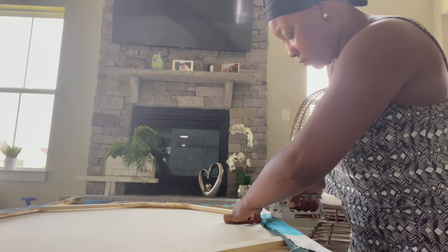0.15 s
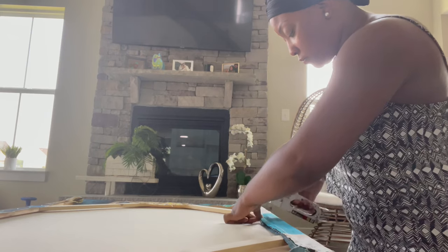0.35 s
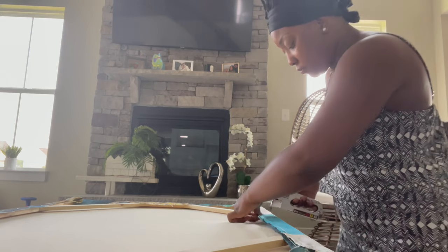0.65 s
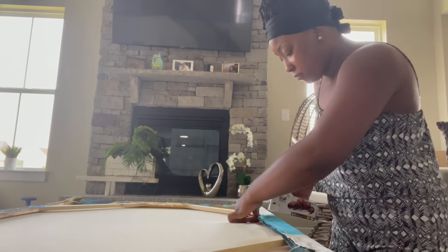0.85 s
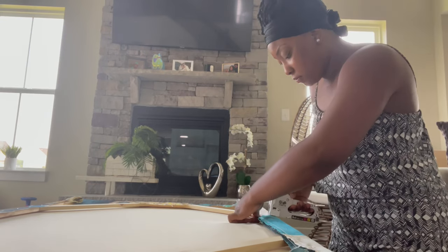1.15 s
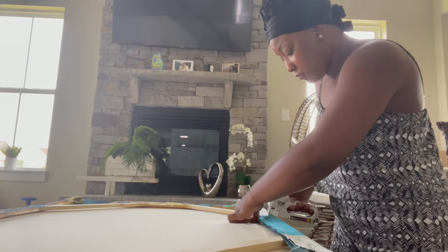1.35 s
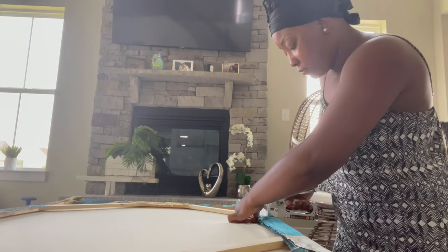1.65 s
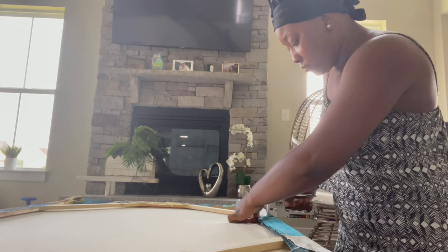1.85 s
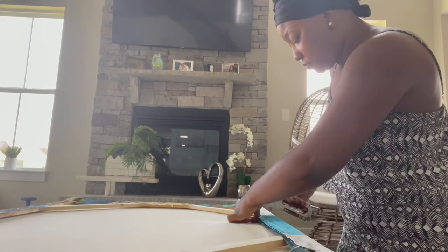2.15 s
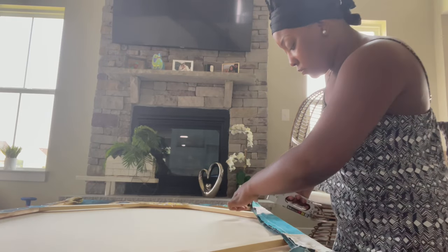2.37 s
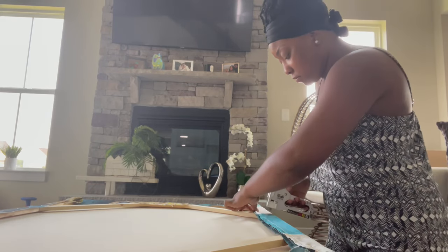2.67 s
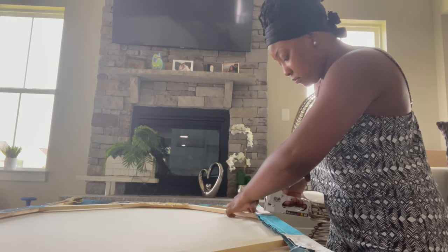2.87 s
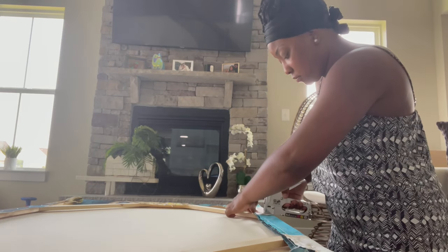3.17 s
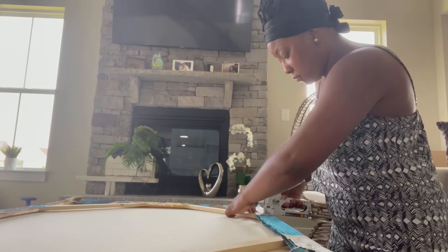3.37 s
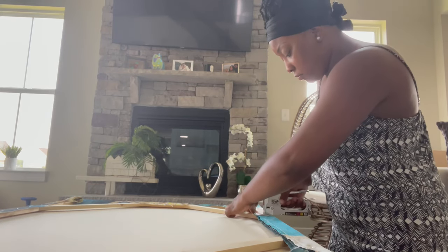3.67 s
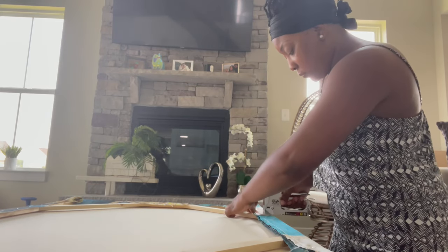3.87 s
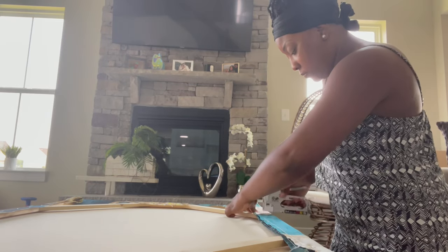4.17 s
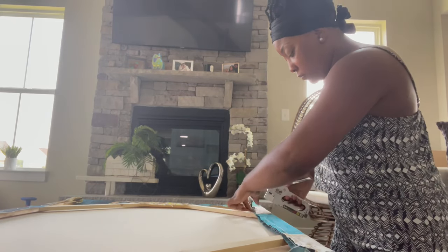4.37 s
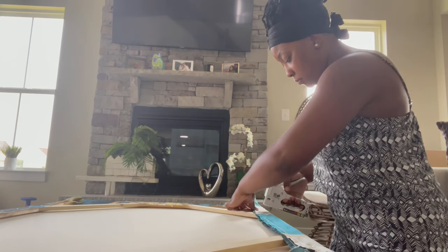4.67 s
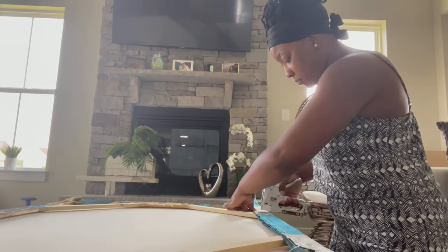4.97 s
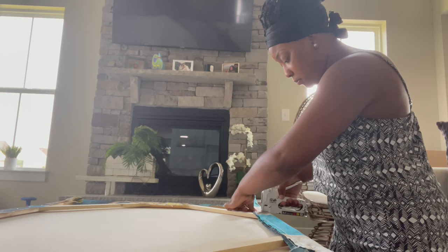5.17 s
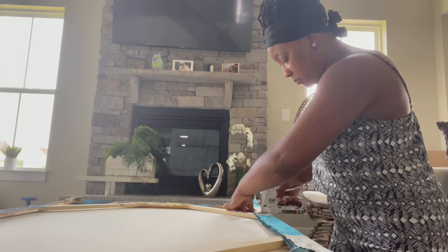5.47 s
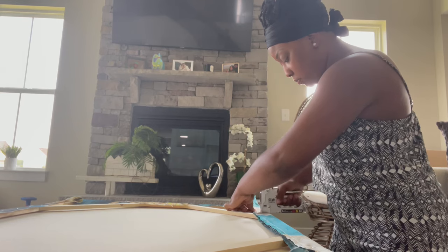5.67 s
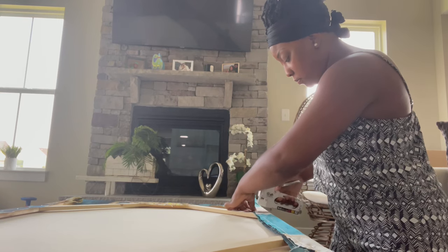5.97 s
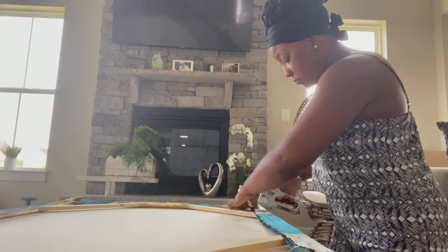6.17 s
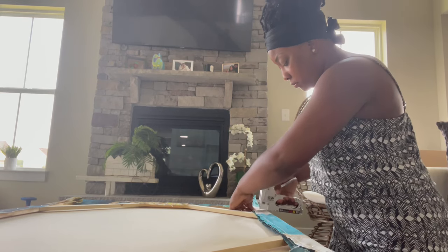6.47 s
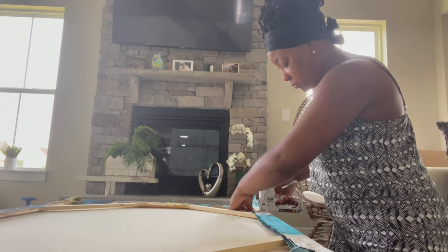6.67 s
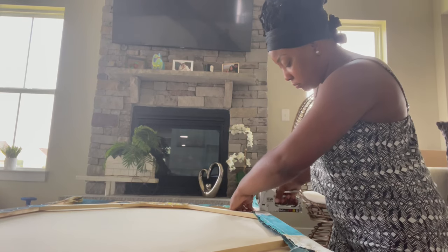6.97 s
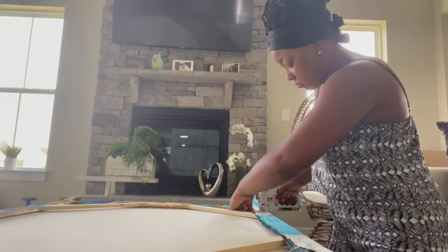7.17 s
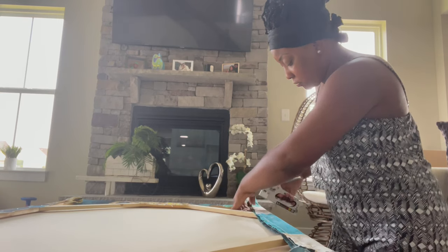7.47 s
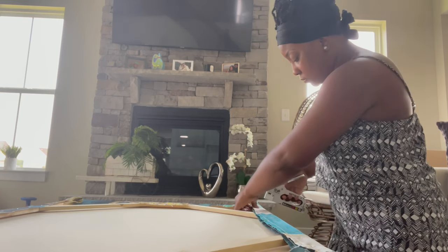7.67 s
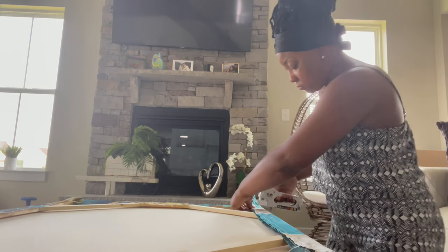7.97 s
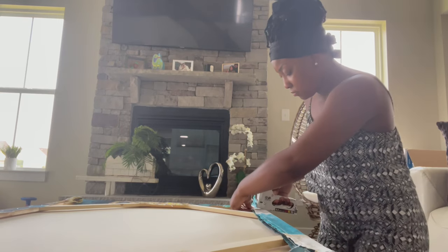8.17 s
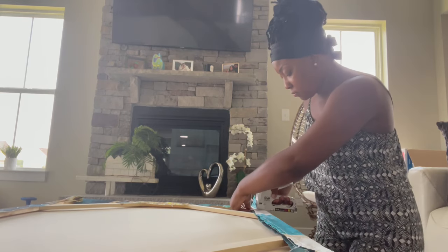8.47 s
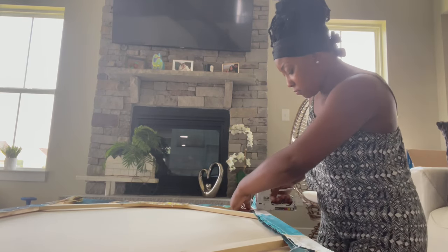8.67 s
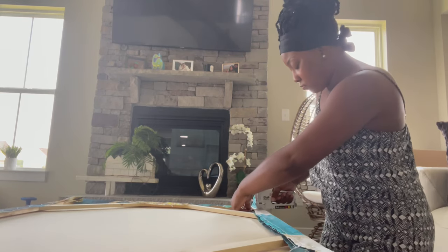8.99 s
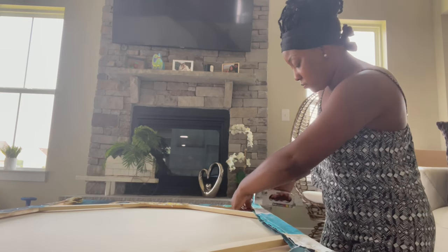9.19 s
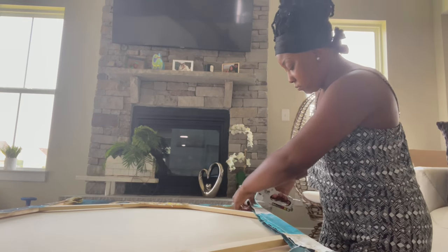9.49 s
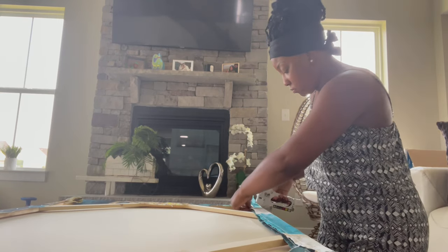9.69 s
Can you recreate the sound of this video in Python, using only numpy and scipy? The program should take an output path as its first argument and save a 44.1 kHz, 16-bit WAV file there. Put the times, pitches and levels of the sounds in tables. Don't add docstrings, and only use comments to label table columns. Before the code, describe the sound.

A hand staple gun fires five loud, cracking staples into a wooden frame in a hard, echoing living room, each preceded by clicks and followed by a lever snap.

```python
import sys
import numpy as np
from scipy import signal
from scipy.fft import rfft, irfft
from scipy.io import wavfile
from scipy.ndimage import uniform_filter1d, minimum_filter1d

SR = 44100
rng = np.random.default_rng(int(sys.argv[2]) if len(sys.argv) > 2 else 0)


def transcribe(signal):
    frames = np.atleast_2d(signal).T
    limited = np.clip(frames, -1, 1)
    pcm = np.round(limited * 32767).astype(np.int16)
    wavfile.write(sys.argv[1], SR, pcm)


def attenuation_scalar(level_db):
    decades = np.asarray(level_db, float) / 20
    return 10 ** decades


N = 433503
LEAD = SR // 4

# (frequency [Hz], level [dB], t60 [s])
STEEL_MODES = [(3253, -0.5, 0.017), (3847, 2.5, 0.02), (4030, -11, 0.14), (4790, -1, .01),
               (5700, -2.5, .015)]
# (frequency [Hz], level [dB], t60 [s])
SIZZLE_MODES = [(6340, 2.5, 0.012), (7412, 3.5, 0.0096), (8230, -0.5, .01), (10430, 7, 0.0055),
                (11970, 2.5, .008), (14500, -11, .005)]


def evened(x):
    return x / np.sqrt(np.mean(x ** 2) + 1e-20)


def read(points, hz):
    f, value = np.transpose(points)
    return np.interp(np.log(hz + 1), np.log(f + 1), value)


def coloured(x, points):
    n = x.shape[-1]
    gain = attenuation_scalar(read(points, np.fft.rfftfreq(n, 1 / SR)))
    return irfft(rfft(x) * gain, n)


def add(mix, s, db, sound):
    loudest = np.sqrt(uniform_filter1d((sound ** 2).mean(0), 176).max())
    part = mix[:, LEAD + round(s * SR):][:, :sound.shape[1]]
    part += attenuation_scalar(db) / loudest * sound[:, :part.shape[1]]


def burst(length):
    u = np.arange(1500) / SR / max(length, 2e-4)
    contacts = rng.standard_normal((2, len(u))) * rng.exponential(1, len(u))
    return contacts * u * np.exp(-u)


def ring(drive, modes):
    t = np.arange(9000) / SR
    hz, db, t60 = np.transpose(modes)[:, :, None]
    detune = 1 + .015 * rng.standard_normal(hz.shape)
    decay = attenuation_scalar(db - 60 * t / np.maximum(t60, .002))
    body = (decay * np.sin(2 * np.pi * hz * detune * t)).sum(0)
    return signal.fftconvolve(drive, body[None], axes=1)


def house():
    # (frequency [Hz], level per Hz [dB])
    rumble = [(15, -53), (25, -23), (49, -3), (110, 0), (133, -9), (167, 1), (188, -15), (241, 3),
              (279, -15), (308, -13), (767, -24.5), (911, -26.5), (1570, -26), (1730, -46), (9000, -73),
              (11700, -107), (19800, -120)]
    # (frequency [Hz], width [Hz], level [dB])
    hums = [(60, 14, -59.5), (165, 14, -64), (245, 23, -65.5), (1560, 60, -90)]
    rumble_db, swell_db = -51, 1.8
    air = rng.standard_normal((2, N))
    swell = evened(uniform_filter1d(rng.standard_normal(N), 5000))
    out = attenuation_scalar(rumble_db - 0.5 + swell_db * swell) * evened(coloured(air, rumble))
    f = np.fft.rfftfreq(N, 1 / SR)
    for hz, width, db in hums:
        resonance = 1 + ((f - hz) / width) ** 2
        out += attenuation_scalar(db) * evened(irfft(rfft(air[::-1]) / resonance, N))
    return out


def shots(mix):
    # (time [s], crack [dB], wood [dB], table rebound [dB], length [s])
    blows = [
        (1.7669, -5, -18, -38, 0.003),
        (3.8642, -7, -16, -37, 0.003),
        (5.5938, -8, -18.5, -33.5, 0.0034),
        (6.991, -8, -21, -34, 0.0025),
        (8.8072, -5.5, -24, -52.5, 0.0034),
    ]
    earlier_blow = (-0.14, -4.5, -16, -36.5, -0.03)
    # (frequency [Hz], level [dB])
    crack = [(300, -12), (900, 3.5), (1500, 2), (2600, -3), (4000, 2), (6000, -5), (8500, -6),
             (11000, -7.5), (14000, -8), (17000, -18.5)]
    # (frequency [Hz], level [dB], t60 [s])
    wood = [(365.6, -10.5, 0.17), (1061, -1.5, 0.14), (1286, -7.5, 0.29)]
    # (delay [s], frequency [Hz], t60 [s])
    rebound = (.052, 68, 0.11)
    late, hz, t60 = rebound
    for s, crack_db, wood_db, rebound_db, length in [earlier_blow, *blows]:
        blow = burst(length)
        padded = np.pad(blow, [(0, 0), (0, 548)])
        add(mix, s - .003, crack_db + 9.5, coloured(padded, crack))
        add(mix, s, crack_db - 2.5, ring(blow, STEEL_MODES + SIZZLE_MODES))
        add(mix, s, wood_db + 3, ring(burst(.0015), wood))
        add(mix, s + late, rebound_db, ring(abs(burst(0.0034)), [(hz, 0, t60)]))


def room(x):
    # (frequency [Hz], t60 [s])
    room_t60 = [(100, .35), (300, 0.67), (1000, .8), (2500, 0.83), (4000, 0.81), (7000, 0.67),
                (12000, 0.46)]
    # (frequency [Hz], level [dB])
    room_colour = [(100, -7), (400, 1), (900, -7), (1500, -4), (2500, 0), (3800, -3), (6000, -5.5),
                   (9000, 0.5), (14000, -8)]
    # (delay [s], level [dB])
    echoes = [(.0035, -11.5), (.007, -14), (.015, -12.5), (0.033, -12.5), (.043, -11.5), (0.062, -12.5)]
    taps = np.zeros((2, SR + SR // 2))
    jitter = rng.integers(0, 20, (2, (taps.shape[1] - 261) // 20))
    at = np.arange(260, taps.shape[1] - 20, 20) + jitter
    np.put_along_axis(taps, at, rng.choice([-1., 1.], at.shape), 1)
    hz, t, z = signal.stft(taps, SR, nperseg=256)
    build = 1 - np.exp(-t / 0.011)
    decay = attenuation_scalar(-60 * t / read(room_t60, hz)[:, None])
    tail = 0.079 * signal.istft(z * build * decay, SR, nperseg=256)[1]
    for s, db in echoes:
        tail[:, round(s * SR)] += attenuation_scalar(db) * rng.choice([-1., 1.], 2)
    return signal.fftconvolve(x, coloured(tail, room_colour), axes=1)[:, :x.shape[1]]


def lever_clicks(mix):
    # (time [s], steel [dB], housing re steel [dB], housing frequency [Hz],
    # sizzle re steel [dB], length [s])
    releases = [
        (0.2398, -21.5, -4, 1332, 0, 0.0012),
        (2.1053, -24, -4, 1560, 1, 0.0012),
        (4.1897, -25, -7, 1560, 3, 0.0012),
        (5.937, -23, -6, 1290, 1.5, 0.00093),
        (7.3481, -23, -4, 1444, 1.5, 0.001),
        (9.17, -22, -8, 1473, -0.5, 0.0012),
    ]
    latches = [(1.494, -44, 2, 1436, -6, 0.0017), (1.5554, -41.5, -1.5, 1470, -11, 0.0015),
               (1.5998, -35, -8.5, 1130, 3.5, 0.0015), (1.6164, -25.5, -5.5, 1435, 1, 0.0013),
               (3.4477, -54.5, -1, 1430, -12, 0.0015), (3.5339, -39.5, -2.5, 1560, -6, 0.0015),
               (3.558, -45.5, 10, 1246, 10, 0.0015), (3.5891, -29, -7, 1350, -4.5, 0.0015),
               (5.3121, -60.5, 12.5, 1185, -27, 0.0018), (5.366, -55.5, 8.5, 1380, -15.5, 0.0014),
               (5.4151, -45.5, -10.5, 1311, -6.5, 0.0015), (5.4545, -34.5, 0.5, 1496, 4.5, 0.0015),
               (5.4674, -19.5, -7.5, 1372, -7, 0.0014), (6.6999, -27.5, 3.5, 1271, 0, 0.0012),
               (6.8174, -35, -3.5, 1512, -1, 0.0015), (6.8274, -26.5, 3, 1380, -2.5, 0.0013),
               (8.4401, -60, 11, 1470, 0, 0.0017), (8.5957, -25, -6.5, 1370, -3.5, 0.0017)]
    ticks = [(0.721, -65, 10.5, 1550, -24, 0.0015), (0.8345, -53.5, -10, 1420, -12, 0.0015),
             (1.2734, -77, 12, 1560, -5, 0.0015), (1.4534, -73, 14.5, 1307, 8.5, 0.0017),
             (2.5976, -71, 7.5, 1600, -28.5, 0.0015), (2.6793, -70, -0.5, 1275, 3, 0.0015),
             (2.7744, -61.5, -4, 1550, -15.5, 0.0015), (4.653, -61, 1, 1500, -6, 0.0013),
             (7.8358, -59, 4, 1220, -10.5, 0.0013), (8.3422, -68, 12, 1440, -21, 0.0015),
             (8.3917, -66, 2.5, 1520, -17, 0.0013), (8.5148, -63.5, 1, 1347, -6.5, 0.0014),
             (8.5348, -61.5, 8.5, 1540, 1, 0.001), (9.6199, -63.5, -1, 1347, -4, 0.0015)]
    for s, db, housing_db, housing_hz, sizzle_db, length in [*releases, *latches, *ticks]:
        blow = burst(length)
        housing = [(housing_hz, 0, .022), (1.13 * housing_hz, -6, .03)]
        add(mix, s - .001, db, ring(blow, STEEL_MODES))
        add(mix, s - .001, db + housing_db, ring(blow, housing))
        add(mix, s - .001, db + sizzle_db, ring(blow, SIZZLE_MODES))


def handle_pings(mix):
    # (time [s], level [dB])
    pings = [(0.7768, -62), (0.8839, -61), (1.049, -62), (1.1222, -63), (1.1865, -59.5), (1.2475, -59),
             (1.274, -62.5), (1.3476, -64), (3.204, -61), (3.2958, -59.5), (3.3594, -74), (3.4038, -58),
             (5.1597, -54.5), (5.2205, -59), (8.2521, -65)]
    # (frequency [Hz], t60 [s])
    handle_mode = (1600, .09)
    hz, t60 = handle_mode
    for s, db in pings:
        add(mix, s, db, ring(burst(0.0024), [(hz, 0, t60)]))


def frame_bumps(mix):
    # (time [s], level [dB], frequency [Hz], t60 [s])
    bumps = [(0.872, -38, 245, 0.07), (0.92, -33, 159, 0.056), (1.554, -35, 153, 0.06),
             (1.598, -40, 427, 0.06), (2.869, -38.5, 276, 0.06), (3.535, -41.5, 153, 0.062),
             (4.93, -36, 293, 0.061), (4.979, -40.5, 156, 0.06), (5.457, -46, 423, 0.071),
             (6.704, -32.5, 444, 0.069), (6.827, -52, 431, 0.052), (8.595, -34.5, 430, 0.06),
             (9.736, -38, 384, 0.06)]
    for s, db, hz, t60 in bumps:
        add(mix, s, db, ring(abs(burst(0.0017)), [(hz, 0, t60), (1.3 * hz, -6, 0.5 * t60)]))


def rustle():
    # (time [s], level [dB])
    cloth = [
        (7.95, -79.5),
        (8.434, -76.5),
        (8.442, -55),
        (8.458, -69.5),
        (8.576, -72),
        (8.594, -29.5),
        (8.6, -27.5),
    ]
    s, db = np.transpose(cloth)
    grains = rng.standard_normal((2, N)) * attenuation_scalar(1.4 * rng.exponential(1, N))
    hiss = evened(coloured(grains, [(600, -20), (1500, 3.5), (4000, 2), (8000, -4), (13000, -10.5)]))
    return hiss * attenuation_scalar(np.interp(np.arange(N) / SR, s, db, -140, -140) + 1)


def scene():
    # (frequency [Hz], level [dB])
    ports = [(60, -12.5), (250, -6), (500, -3.5), (900, 5.5), (2000, -1.5), (3500, 4), (6200, 0),
             (7500, -0.5), (9200, 10), (10300, -1.5), (11700, -12.5), (12800, 0), (13800, 14.5),
             (17000, 13.5)]
    gun = np.zeros((2, N + LEAD))
    shots(gun)
    lever_clicks(gun)
    handle_pings(gun)
    frame_bumps(gun)
    air = (gun + room(gun))[:, LEAD:] + rustle() + house()
    side = attenuation_scalar(read(ports, np.fft.rfftfreq(N, 1 / SR)))
    weights = [1 + 0 * side, side] / np.sqrt(.5 + .5 * side ** 2)
    both, apart = irfft(rfft(air) * weights, N)
    return np.array([both + apart, both - apart]) * attenuation_scalar([[.8], [-.8]])


def low_pass(x):
    return signal.sosfilt(signal.butter(12, 17150, fs=SR, output="sos"), x)


def record(dry):
    low = signal.sosfiltfilt(signal.butter(2, 350, fs=SR, output="sos"), dry)
    high = dry - low
    power_db = 10 * np.log10(abs(uniform_filter1d((high ** 2).mean(0), 440)) + 1e-12)
    cut_db = 0.65 * np.maximum(power_db + 20.5, 0)
    hold = round(.11 * SR)
    cut_db = -minimum_filter1d(-cut_db, size=hold, origin=hold // 2 - 1)
    cut_db[0] = 12.5
    fall = np.arange(N) * 65.0 / SR
    cut_db = np.maximum(np.maximum.accumulate(cut_db + fall) - fall, 0)
    mix = low + high / attenuation_scalar(uniform_filter1d(cut_db, 300))
    return low_pass(mix)


dry = scene()
out = record(dry)
transcribe(out)
```